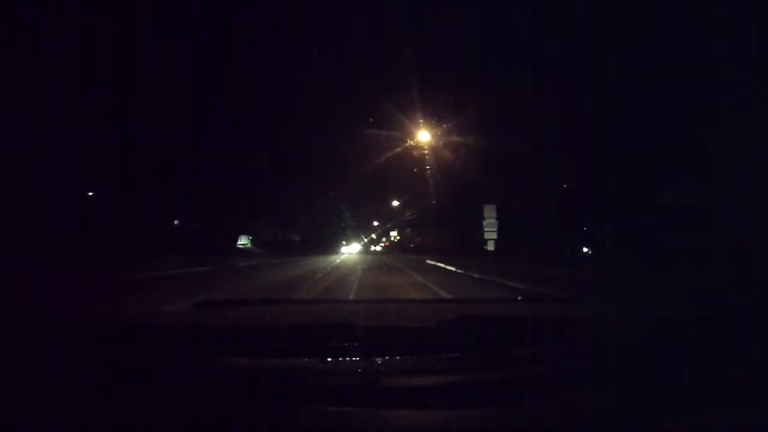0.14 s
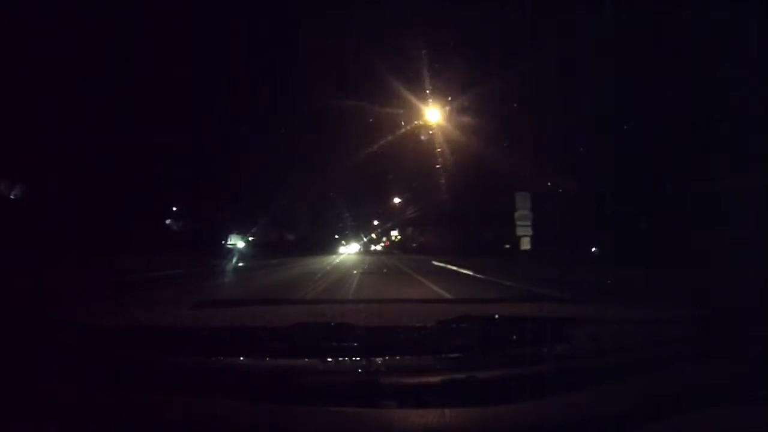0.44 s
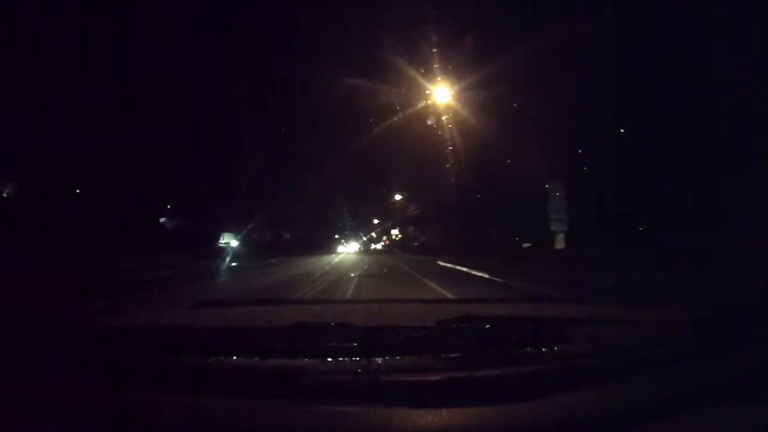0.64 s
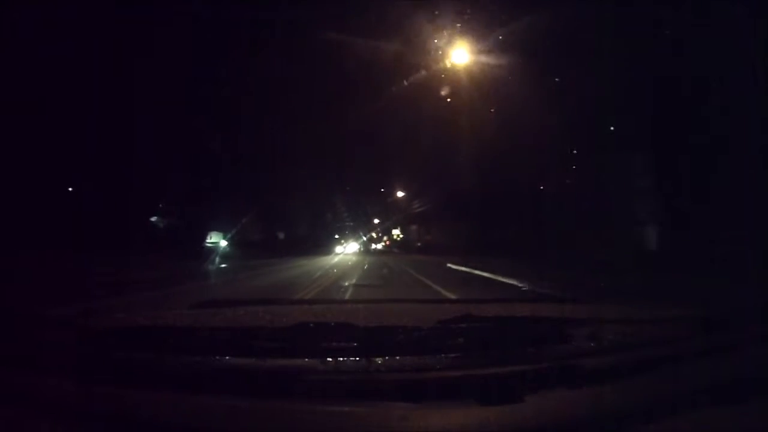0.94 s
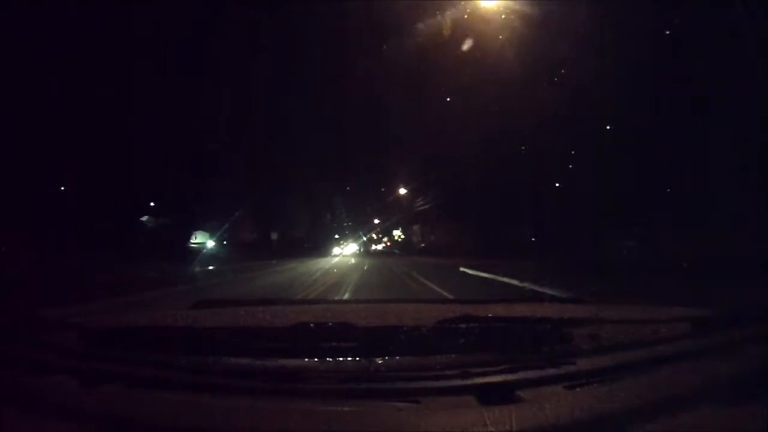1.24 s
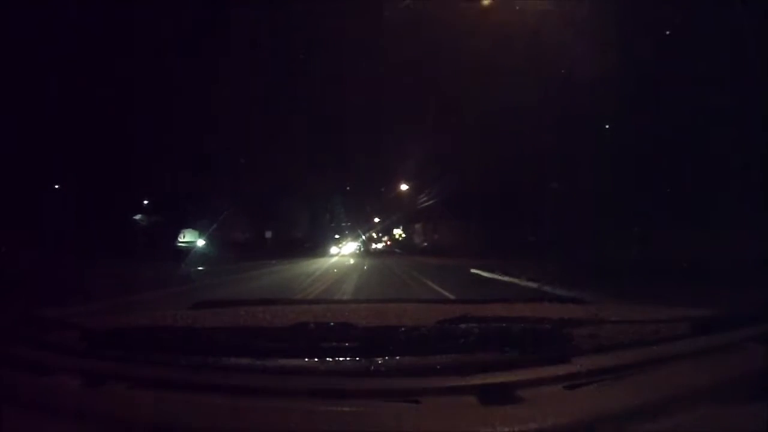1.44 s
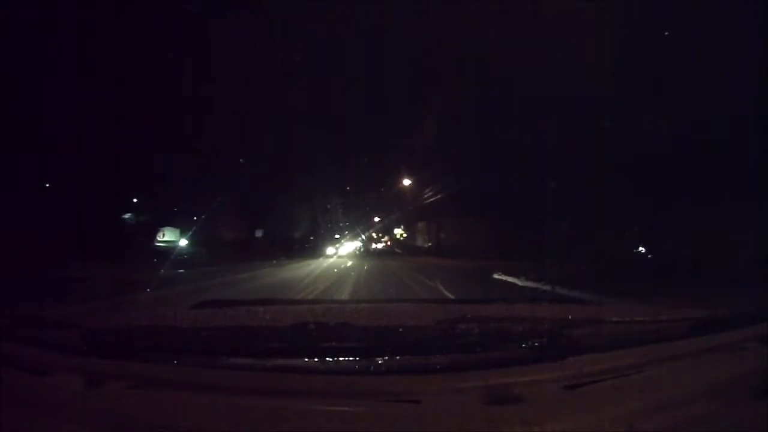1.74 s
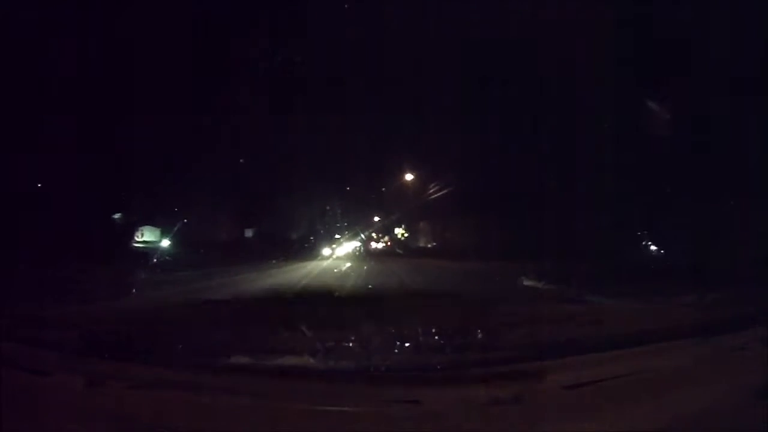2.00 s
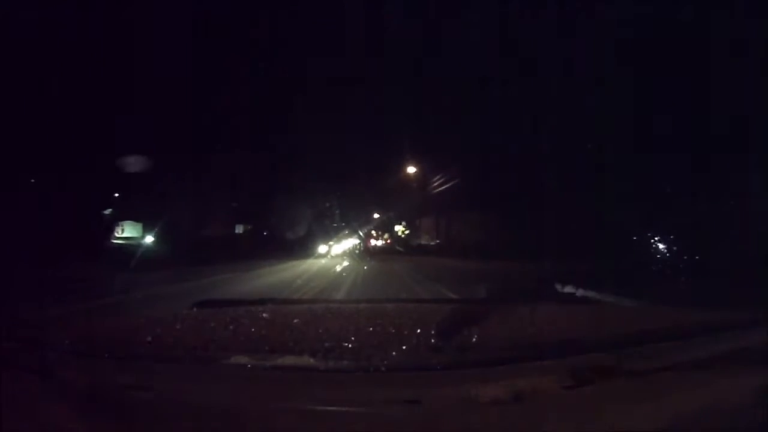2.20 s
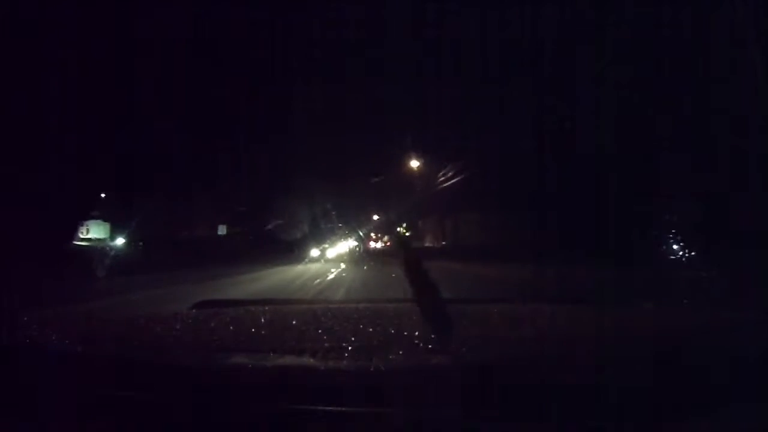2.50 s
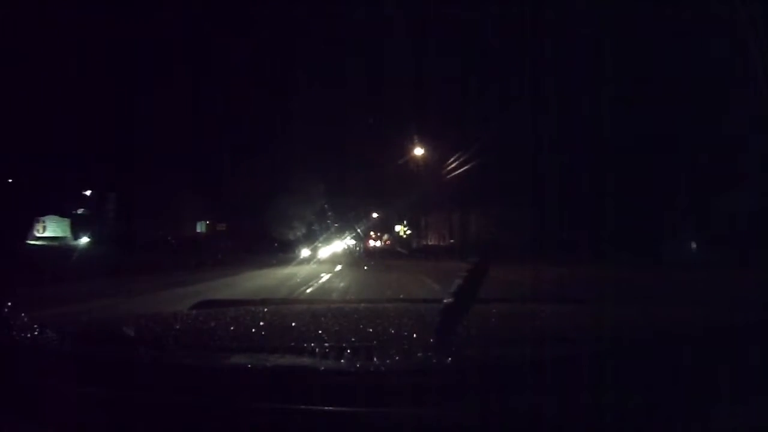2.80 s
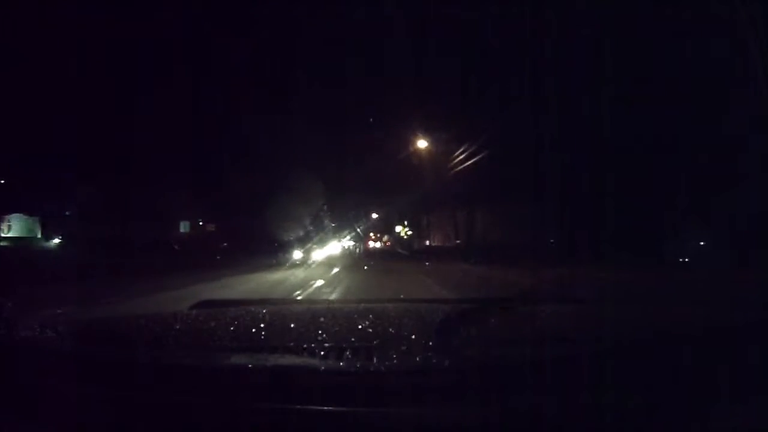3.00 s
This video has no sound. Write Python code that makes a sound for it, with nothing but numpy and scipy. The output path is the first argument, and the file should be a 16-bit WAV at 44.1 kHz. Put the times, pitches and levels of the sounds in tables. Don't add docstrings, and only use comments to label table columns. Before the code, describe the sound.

Low car engine drone and road rumble inside a cabin at night, with a few dull thuds

```python
import sys
import numpy as np
from scipy import signal
from scipy.fft import rfft, irfft
from scipy.io import wavfile
from scipy.ndimage import uniform_filter1d

SR = 44100
rng = np.random.default_rng(int(sys.argv[2]) if len(sys.argv) > 2 else 0)


def generate_wav(sig):
    pcm = np.round(np.clip(np.atleast_2d(sig).T, -1, 1) * 32767).astype(np.int16)
    wavfile.write(sys.argv[1], SR, pcm)


def ratio(d):
    e = np.asarray(d, float) / 20
    return 10 ** e


N = 138915
T = np.arange(N) / SR
SAMPLE_HZ, HOLD = 12000, 4

# (time [s], third order [Hz], load [dB])
ENGINE_RUN = [(0, 82.5, -19.5), (.12, 84.2, -18.5), (.6, 84.1, -18.5), (1.1, 83.1, -20.5),
              (1.5, 82.8, -19.5), (1.66, 80.2, -20), (1.84, 76.5, -20), (2.03, 75.3, -23),
              (2.22, 75.2, -18.5), (2.42, 79.2, -19.5), (2.55, 82.6, -19.5), (2.68, 80.5, -21.5),
              (2.8, 77.5, -29), (3.15, 76, -31.5)]
# (time [s], peak level [dB])
BODY_THUDS = [
    (1.209, -9),
    (1.969, -8),
    (2.167, -5),
    (2.503, -8),
]


def rms_one(x):
    return x / np.sqrt(np.mean(x ** 2) + 1e-20)


def in_time(rows):
    s, *columns = np.transpose(rows)
    return [np.interp(T, s, c) for c in columns]


def drift(rate_hz):
    r = np.exp(-80 * np.pi * rate_hz / SR)
    white = rng.standard_normal(N // 40 + 2002)
    slow = signal.lfilter([1], [1, -2 * r, r * r], white)[2000:]
    return np.interp(np.arange(N) / 40, np.arange(len(slow)), rms_one(slow))


def resonate(x, hz, width_hz):
    r = np.exp(-np.pi * width_hz / SR)
    poles = [1, -2 * r * np.cos(2 * np.pi * hz / SR), r * r]
    return signal.lfilter([(1 - r * r) / 2, 0, (r * r - 1) / 2], poles, x)


def engine():
    # (order, level against load [dB], wobble [dB])
    orders = [(1, -12, 6.5), (2, 1.2, 2), (3, 0.64, 0.62), (4, -14, 2.8), (5, -21.5, 1.9)]
    # (centre [Hz], width [Hz], gain [dB])
    booms = [(103.1, 5.3, 7), (126.3, 4.8, 17)]
    third_hz, load_db = in_time(ENGINE_RUN)
    cycle_hz = third_hz / 3
    turns = np.cumsum(cycle_hz) / SR
    out = 0
    for k, db, wobble_db in orders:
        boom_db = sum(gain_db * np.exp(-((k * cycle_hz - hz) / width_hz) ** 2)
                      for hz, width_hz, gain_db in booms)
        level_db = load_db + db + boom_db + wobble_db * drift(3.0)
        out = out + ratio(level_db) * np.sin(2 * np.pi * (k * turns + rng.random()))
    return np.sqrt(2) * out


def engine_dip():
    dip_depth, dip_s = 0.8, 0.014
    return 1 - dip_depth * sum(np.exp(-((T - s) / dip_s) ** 2) for s, _ in BODY_THUDS)


def road(level_db, load_swing_db):
    # (centre [Hz], width [Hz], level [dB])
    cabin = [(22, 27, 1), (38.7, 14.3, 4), (50, 24.4, -5.5), (103.7, 49, -1), (190.6, 33.5, 1),
             (240.2, 41, -7.5), (301.8, 47.4, -7.5), (419, 77, -12.5), (518.7, 74, -8.5), (685, 77, -14),
             (820.5, 52, -19.5), (1080, 36, -22), (1169, 164, -19), (1366, 83, -20)]
    between_db, patchy_db = -6.5, 0.7
    shake_follows = 0.73
    out, shared = 0, drift(9.0)
    for hz, width_hz, db in cabin:
        once = resonate(rng.standard_normal(N + SR), hz, width_hz)
        twice = resonate(once, hz, width_hz * 1.55)
        ring = rms_one(twice + ratio(between_db) * once)[SR:]
        shake_db = (hz < 70) * shake_follows * load_swing_db
        patch_db = patchy_db * (0.7 * shared + drift(3.1))
        out = out + ring * ratio(db + shake_db + patch_db)
    return out * ratio(level_db)


def bumps():
    thud_hz, t60_s = 45, 0.07
    out = np.zeros(N)
    for s, db in BODY_THUDS:
        t = np.maximum(T - s + 0.25 / thud_hz, 0)
        level_db = db + 15 / thud_hz / t60_s - 60 * t / t60_s
        out += ratio(level_db) * np.sin(2 * np.pi * thud_hz * t)
    return out


def glass_ticks():
    drops_per_s, spread_db = 160, 4
    sizes = ratio(spread_db * np.minimum(rng.exponential(1, N), 4)) * rng.choice([-1, 1], N)
    hits = rng.random(N) < drops_per_s * ratio(4.0 * drift(6.0)) / SR
    return rms_one(resonate(rms_one(sizes * hits), 4800, 5600))


def air(spray_swing_db):
    # (frequency [Hz], level [dB])
    hiss_spectrum = [(200, 7.5), (800, -6), (1700, -5.4), (2700, -3.5), (4000, -5.5), (5500, -5.5)]
    air_db, drops_db, follows = -42, -49.5, 0.61
    edges_hz = 200 * 2 ** np.arange(0, 5.1, 0.5)
    out, shared = 0, drift(14.0)
    white = rng.standard_normal((2, N))
    hz, db = np.transpose(hiss_spectrum)
    for k, (low, high) in enumerate(zip(edges_hz, edges_hz[1:])):
        band_pass = signal.butter(2, [low, high], "band", fs=SR, output="sos")
        band = signal.sosfilt(band_pass, white[k % 2])
        band_db = np.interp(np.log(low * high) / 2, np.log(hz), db)
        out = out + band * ratio(band_db + 0.27 * shared + 1.6 * drift(20.5))
    hiss = ratio(air_db) * rms_one(out)
    return (hiss + ratio(drops_db) * glass_ticks()) * ratio(follows * spray_swing_db)


def splats():
    # (time [s], peak level [dB])
    big_drops = [(0.1254, -35), (0.184, -27), (0.413, -31.5), (0.7692, -30), (1.1304, -40), (1.4244, -40),
                 (1.8354, -30.5), (1.9545, -27), (2.0524, -29), (2.0916, -28), (2.3704, -32), (2.5754, -41),
                 (2.6898, -32), (2.7773, -26.5), (2.8484, -40), (2.878, -27), (2.992, -41), (3.0704, -33)]
    t60_s = 0.019
    shape = sum(ratio(db - 5.0 - 60 * np.maximum(T - s, 0) / t60_s) * (T >= s) for s, db in big_drops)
    return shape * rms_one(resonate(rng.standard_normal(N), 4000, 3500))


def scene():
    # (time [s], level [dB])
    roughness = [(0.0, -26.5), (0.07, -27.5), (0.86, -30), (0.91, -28), (1.1, -28.5), (1.17, -25.5),
                 (1.21, -29), (1.42, -29.5), (1.49, -31.5), (1.7, -25), (1.71, -26), (3.15, -27.5)]
    # (time [s], level [dB])
    spray = [(0.0, -53), (0.05, -46.5), (0.11, -45.5), (0.21, -52), (1.44, -45.5), (1.49, -52.5),
             (1.73, -44.5), (2.02, -48), (2.06, -45), (2.17, -44), (2.18, -48), (2.29, -43.5), (2.4, -45.5),
             (3.15, -49)]
    road_db, spray_db = in_time(roughness)[0], in_time(spray)[0]
    load_db = uniform_filter1d(in_time(ENGINE_RUN)[1], size=SR // 4)
    mix = engine_dip() * engine() + road(road_db, load_db - load_db.mean()) + bumps()
    mix = mix + air(spray_db - spray_db.mean()) + splats()
    return mix[None]


def treble_gaps(x):
    # (time [s], from [Hz], half length [s], spared band [Hz], spared band [Hz])
    gaps = [
        (2.431, 1600, .010, 8300, 2200),
        (2.922, 3200, .008, 5200, 4300),
        (3.05, 2900, .009, 7200, 4800),
    ]
    gap_db, spared_width_hz, cutoff_hz = -30, 300, 15270
    hz, spectrum = np.arange(N // 2 + 1) * SR / N, rfft(x)
    for s, from_hz, half_s, *spared_hz in gaps:
        spared = [abs(hz - f) > spared_width_hz / 2 for f in spared_hz + [SAMPLE_HZ]]
        lost = irfft(spectrum * ((hz > from_hz) & np.all(spared, axis=0)), N)
        x = x - lost * (1 - ratio(gap_db)) * np.exp(-((T - s) / half_s) ** 2)
    return irfft(rfft(x) * (hz < cutoff_hz), N)


def duck_gain_db(dry):
    # (time [s], depth [dB])
    dips = [(0.025, 8), (0.202, 2.5), (0.317, 4.5), (.502, 2), (0.67, 6), (.855, 2.5), (1.028, 1.5),
            (1.21, 6), (1.432, -2), (1.47, 2), (1.532, 2.5), (1.919, 1.5), (1.969, 4), (2.165, 11),
            (2.504, 3), (2.582, 1)]
    lag_s, attack_s, recover_s = 0.0071, 0.0015, 0.034
    levelling = 0.24
    since_s = [T - s - lag_s for s, _ in dips]
    duck_db = sum(db * np.exp(-abs(t) / recover_s) * (t > 0) for t, (_, db) in zip(since_s, dips))
    power = uniform_filter1d(dry[0] ** 2, size=SR // 25, origin=SR // 51)
    heard_db = 10 * np.log10(power + 1e-9)
    duck_db = duck_db + levelling * (heard_db - heard_db.mean())
    r = np.exp(-1 / (attack_s * SR))
    return signal.lfilter([1 - r], [1, -r], duck_db)


def band_limit(x):
    return signal.sosfilt(signal.butter(12, 15600, fs=SR, output="sos"), x)


def record(dry):
    mic_low_hz, guard_hz = 7.5, 5450
    x = signal.sosfilt(signal.butter(1, mic_low_hz, "high", fs=SR, output="sos"), dry)
    x = 0.76 * np.tanh(x * ratio(-1.5 - duck_gain_db(dry)) / 0.75)
    x = signal.sosfilt(signal.butter(16, guard_hz, fs=SR, output="sos"), x)
    coarse = signal.resample(x, N * SAMPLE_HZ // SR, axis=1)
    held = np.repeat(coarse, HOLD, axis=1)
    mix = treble_gaps(signal.resample(held, N, axis=1))
    return band_limit(mix)


dry = scene()
out = record(dry)
generate_wav(out)
```